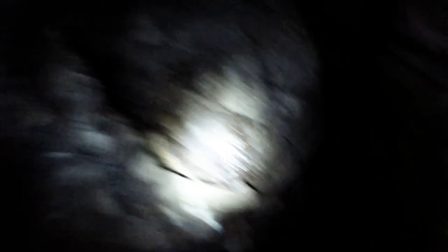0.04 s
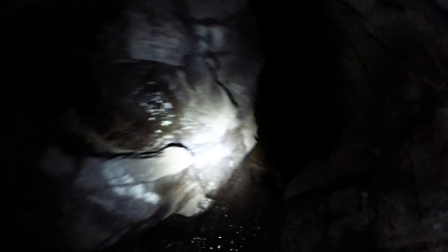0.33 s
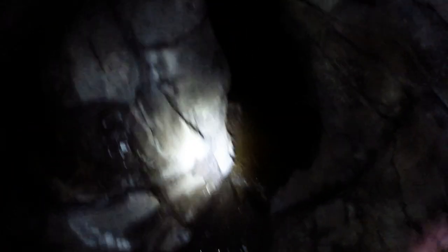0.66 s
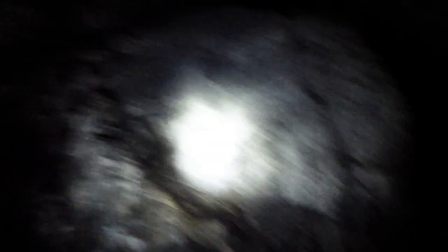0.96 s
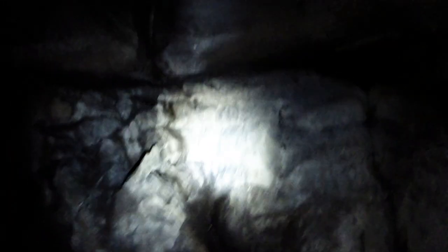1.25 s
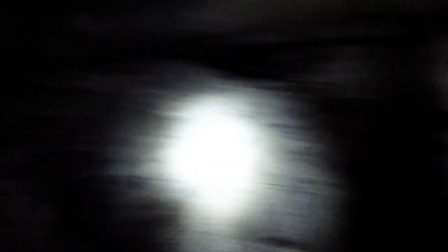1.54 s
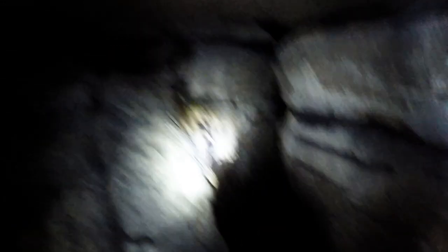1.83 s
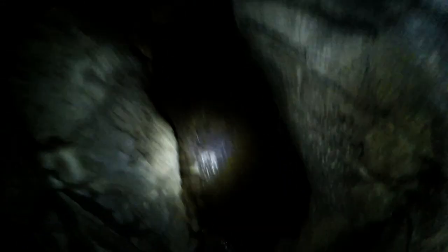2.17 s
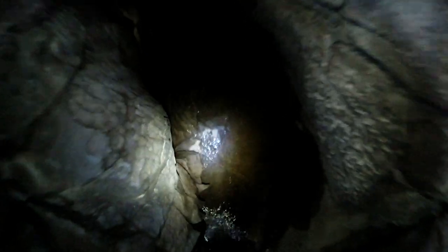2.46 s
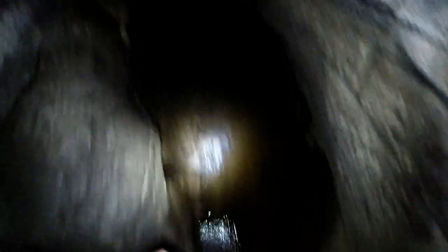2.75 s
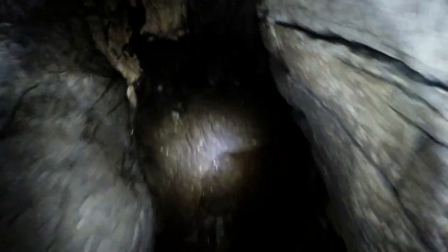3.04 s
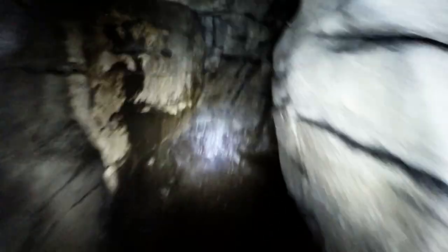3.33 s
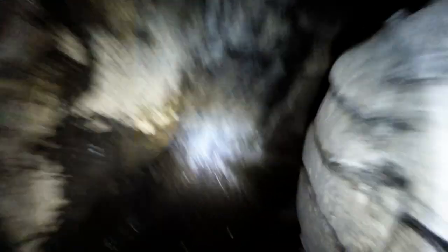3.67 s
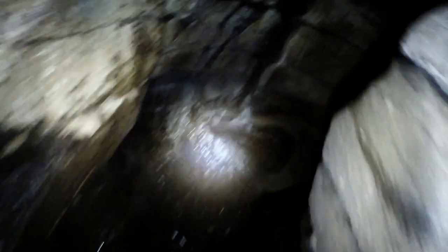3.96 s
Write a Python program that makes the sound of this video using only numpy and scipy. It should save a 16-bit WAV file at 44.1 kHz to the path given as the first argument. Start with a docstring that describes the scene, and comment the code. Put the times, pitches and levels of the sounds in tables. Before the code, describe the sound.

A stream rushes and gurgles steadily in a narrow cave passage. The microphone on a walking caver's helmet rumbles and bumps softly, then scrapes the rock and knocks with a deep thud near the end.

```python
"""A narrow cave passage with a rushing stream, heard from a cased camera on a walking caver's helmet.
Dense bubbles and spray blur between the rock walls, and the case rings near 2.5 kHz. The mount rumbles
and bumps as the caver moves, and the case ticks; at 3 s it scrapes the rock and knocks with a deep thud.
"""
import sys
import numpy as np
from scipy import signal
from scipy.fft import rfft, irfft
from scipy.io import wavfile

SR = 44100
rng = np.random.default_rng(int(sys.argv[2]) if len(sys.argv) > 2 else 0)


def to_wav(sig):
    """Store sig (one row per channel, or 1-D mono) as 16-bit WAV at the path in sys.argv[1].

    Samples outside -1..1 are clipped; the rate is SR.
    """
    pcm = np.clip(np.atleast_2d(sig), -1, 1) * 32767
    pcm = np.round(pcm).astype(np.int16)
    wavfile.write(sys.argv[1], SR, pcm.T)  # frames by channels


N = 176400
T = np.arange(N) / SR

# Swells of the four water layers as the head turns. Each row: time in seconds, level in dB.
CHURN_LEVEL = [(0, -59.5), (.24, -51.5), (.6, -55.5), (.85, -57), (1.1, -49), (1.43, -53), (1.88, -52),
               (2.1, -55.5), (2.65, -56.5), (3.15, -57), (3.4, -56.5), (3.7, -53.5), (4, -53)]
GURGLE_LEVEL = [(0, -51.5), (.1, -50.5), (.23, -43), (.45, -46.5), (.78, -50), (.9, -45), (1.02, -43),
                (1.14, -41.5), (1.3, -45), (1.55, -43), (1.9, -44), (2.1, -46.5), (2.45, -48), (2.9, -47),
                (3.05, -44.5), (3.2, -48.5), (3.3, -45.5), (3.55, -43.5), (3.7, -43.5), (3.8, -45.5),
                (4, -47.5)]
RUSH_LEVEL = [(0, -44), (.15, -43.5), (.7, -44.5), (.82, -45), (.92, -39), (1.1, -37.5), (1.22, -41.5),
              (1.38, -41), (1.52, -39.5), (1.7, -38), (1.92, -43.5), (2.2, -43.5), (2.6, -43.5), (2.8, -40),
              (3.0, -41.5), (3.25, -42), (3.5, -40), (3.8, -43), (4, -46)]
SPRAY_LEVEL = [(0, -51.5), (.22, -51), (.27, -50), (.5, -49), (.8, -49), (1.02, -44.5), (1.3, -47),
               (1.7, -44), (1.95, -48), (2.3, -45.5), (2.55, -47.5), (2.8, -45.5), (3.2, -46.5),
               (3.5, -45.5), (3.75, -49), (4, -46.5)]
# Tone of each layer through the case. Each row: frequency in Hz, gain in dB.
CHURN_EQ = [(190, -2), (300, -5), (460, -4), (650, -2.5), (820, 2), (1000, 1), (1300, -5.5), (2000, -10)]
GURGLE_EQ = [(600, -27), (820, -17.5), (980, -8), (1130, -5), (1310, 3), (1600, 2.5), (1850, -3),
             (2200, -24), (3000, -36)]
RUSH_EQ = [(1400, -25), (1900, -14), (2200, -4.5), (2450, -0.5), (2650, -2.5), (2950, -15), (3500, -16)]
SPRAY_EQ = [(2000, -6.5), (3000, -7.5), (3500, -0.5), (3780, -7), (4120, 1), (4400, -3), (4660, 0.5),
            (5260, -8.5), (5620, -3.5), (5850, -7), (6030, -4.5), (6350, -10), (6700, -7.5), (7300, -14.5),
            (8200, -18.5), (10200, -18.5), (11800, -26.5), (13000, -25.5), (14300, -29), (15300, -23.5)]
# Texture of each layer. In order: bubbles per second, spread of their strengths in dB,
# ring length in cycles, wash level in dB, flutter depth in dB, trim in dB.
CHURN_TEXTURE = (902.5, 2.5, 16.5, -0.5, 1.3, 1)
GURGLE_TEXTURE = (1480, 2.5, 14.5, -1, 1.62, -.5)
RUSH_TEXTURE = (2483, 2, 23, 0.5, 0.5, 1)
SPRAY_TEXTURE = (5007, 3, 6.5, 1.5, 0.55, -0.5)
# Handling rumble of the mount. Each row: time in seconds, level in dB.
RUMBLE_LEVEL = [(0, -42), (.15, -44), (.3, -49), (.55, -49), (.76, -46), (.85, -36), (.98, -44.5),
                (1.15, -38.5), (1.4, -40), (1.65, -35.5), (1.8, -46.5), (2.05, -37.5), (2.3, -49.5),
                (2.55, -42.5), (2.78, -44.5), (2.9, -35), (3.1, -41), (3.3, -42), (3.44, -45.5),
                (3.52, -34), (3.59, -29.5), (3.65, -40.5), (3.85, -47.5), (4, -46.5)]
# Tone of the helmet's noises. Each row: frequency in Hz, gain in dB.
RUMBLE_EQ = [(15, 0), (28, 3), (42, 2.5), (60, -5), (80, -10.5), (110, -6.5), (150, -8.5), (190, -21),
             (260, -29), (500, -69)]
CRUNCH_EQ = [(100, -4), (170, 5), (270, -2), (400, -8), (600, -7), (1100, 0), (1800, -14), (2450, 4),
             (3200, -10), (8000, -29)]
SCRAPE_EQ = [(500, -11), (1500, -5), (2500, 12), (3200, -1.5), (4700, 5.5), (7500, -9.5), (10500, -15),
             (12000, -27), (15000, -26)]
SCUFF_EQ = [(5000, -6), (9500, 8), (12000, -4), (13500, -2), (15000, -3)]
# Taps on the case and bumps in the mount. Each row: start in seconds, strength in dB.
TICK_HITS = [(.052, -24), (.062, -27), (.074, -28), (.109, -28), (3.037, -26.5)]
JOLT_HITS = [(0.108, -29), (.412, -36), (0.695, -40), (0.851, -48), (1.119, -35), (1.151, -44),
             (1.367, -28), (1.405, -27), (1.564, -31.5), (1.676, -43), (1.725, -33), (1.867, -33),
             (2.347, -36), (2.537, -29.5), (2.567, -31.5), (2.652, -36), (2.831, -39), (2.882, -25),
             (3.041, -24), (3.581, -33), (3.672, -37)]
# Blows on the helmet. Each row: start in seconds, strength in dB, contact time in seconds.
KNOCK_HITS = [(2.855, -20.5, 0.021), (2.981, -7.5, 0.019), (3.003, -4.5, 0.0075), (3.024, -15, .012),
              (3.074, -17.5, .014), (3.479, -24.5, 0.011), (3.505, -23, 0.0097), (3.533, -23.5, 0.016),
              (3.588, -24.5, 0.017)]
# Resonances of case and mount. Each row: frequency in Hz, gain in dB, 60 dB decay time in seconds.
CASE_MODES = [(2340, -12.5, 0.065), (2430, 4.5, 0.068), (2590, -4, 0.076)]
MOUNT_MODES = [(42.4, -8.5, 0.57), (55.3, 2, 0.107), (89, -4, 0.083), (133, -4.5, 0.057), (230, -16, 0.11)]


def from_db(db):
    """Decibels to gain."""
    return 10 ** (np.asarray(db) / 20)


def rms_one(x):
    """Scale to unit rms."""
    return x / np.sqrt(np.mean(x ** 2) + 1e-20)


def level(rows):
    """A fader ride through rows of time in seconds and level in dB."""
    return from_db(np.interp(T, *np.transpose(rows)))


def coloured(x, points):
    """EQ a steady sound, falling steeply beyond both ends of the curve; rms 1."""
    hz, db = np.transpose(points)
    f = np.maximum(np.arange(N // 2 + 1) * SR / N, 1)
    skirts = np.minimum(1, np.minimum(f / hz[0], hz[-1] / f)) ** 3
    curve = from_db(np.interp(np.log(f), np.log(hz), db))
    return rms_one(irfft(rfft(x) * skirts * curve, N))


def drift(rate):
    """A smooth random wobble with spread 1."""
    r = np.exp(-80 * np.pi * rate / SR)
    slow = signal.lfilter([1], [1, -2 * r, r * r], rng.standard_normal(N // 40 + 2002))[2000:]
    return np.interp(np.arange(N) / 40, np.arange(len(slow)), rms_one(slow))


def ring(force, hz, t60):
    """A unit click sets a sine of height 1 ringing."""
    r = np.exp(-np.log(1000) / (t60 * SR))
    w = 2 * np.pi * min(hz, SR / 2 - 1) / SR
    return signal.lfilter([0, np.sin(w)], [1, -2 * r * np.cos(w), r * r], force + 1e-18)


def burst(start, attack, hold, t60):
    """Envelope: rise, hold, die away."""
    rise = np.clip((T - start) / attack, 0, 1)
    return rise * np.exp(-np.log(1000) * np.maximum(T - start - attack - hold, 0) / t60)


def grains(per_s, spread_db):
    """Random clicks, many small and a few large."""
    sizes = from_db(spread_db * np.minimum(rng.exponential(1, N), 4)) * rng.choice([-1, 1], N)
    return sizes * (rng.random(N) < per_s / SR)


def push(start, contact):
    """Force of a soft contact, area 1: the longer it lasts, the duller the hit."""
    force = np.sin(np.pi * np.clip((T - start) / contact, 0, 1)) ** 2
    return force / force.sum()


def cave(sound, t60_s=0.37, echo_db=-1.5):
    """Direct sound plus the dense echoes of close rock walls."""
    echoes = rng.standard_normal(SR) * burst(0, 0.012, 0, t60_s)[:SR]
    return sound + from_db(echo_db) * signal.fftconvolve(sound, echoes / np.linalg.norm(echoes))[:N]


def water(swells, eq, texture, low_hz, high_hz, pitch_count=48):
    """Bubbles of many pitches ring in the passage over the wash of water farther away."""
    per_s, spread_db, cycles, wash_db, flutter_db, trim_db = texture
    pops = grains(per_s, spread_db)
    pitch_index = rng.integers(0, pitch_count, N)
    pitches = np.geomspace(low_hz, high_hz, pitch_count)
    bubbles = sum(np.sqrt(hz) * ring(pops * (pitch_index == k), hz, cycles / hz)
                  for k, hz in enumerate(pitches))
    blurred = coloured(cave(bubbles), eq)
    wash = from_db(wash_db) * coloured(rng.standard_normal(N), eq)
    return rms_one(blurred + wash) * level(swells) * from_db(trim_db + flutter_db * drift(36))


def stream():
    """Deep water churns, large bubbles gurgle, small ones rush, spray fizzes."""
    return (water(CHURN_LEVEL, CHURN_EQ, CHURN_TEXTURE, low_hz=273, high_hz=1350)
            + water(GURGLE_LEVEL, GURGLE_EQ, GURGLE_TEXTURE, low_hz=773, high_hz=2480)
            + water(RUSH_LEVEL, RUSH_EQ, RUSH_TEXTURE, low_hz=1577, high_hz=3460)
            + water(SPRAY_LEVEL, SPRAY_EQ, SPRAY_TEXTURE, low_hz=2900, high_hz=16000))


def rumble(shudder_db=1.87, shudder_per_s=12):
    """The mount shudders unevenly as the caver moves."""
    low_end = coloured(rng.standard_normal(N), RUMBLE_EQ)
    shudder = from_db(shudder_db * drift(shudder_per_s))
    return level(RUMBLE_LEVEL) * rms_one(low_end * shudder)


def ticks():
    """Light cushioned taps ring the case, each mode with a new strength on every tap."""
    taps = np.array([from_db(db) * push(start, contact=0.0003) for start, db in TICK_HITS])
    return sum(ring(from_db(db + rng.normal(0, 1.9, len(taps))) @ taps, hz, t60)
               for hz, db, t60 in CASE_MODES) / 2


def jolts():
    """The camera shifts in its mount with short dull bumps."""
    force = sum(from_db(db) * push(start, contact=0.0036) for start, db in JOLT_HITS)
    return ring(force, hz=141, t60=0.051)


def knocks(crunch_db=-29.5):
    """Soft blows shake the mount's low modes and crush a little grit."""
    force = sum(from_db(db) * push(start, contact) for start, db, contact in KNOCK_HITS)
    thud = sum(from_db(db) * ring(force, hz, t60) for hz, db, t60 in MOUNT_MODES)
    crush = sum(from_db(db) * burst(start, contact / 2, hold=0, t60=0.11)
                for start, db, contact in KNOCK_HITS)
    grit = coloured(grains(per_s=4300, spread_db=3), CRUNCH_EQ)
    return thud + from_db(crunch_db) * crush * grit


def scrape(start_s=2.944, attack_s=0.021):
    """The case brushes the rock just before the big thud, with a bright scuff at first touch."""
    rub = from_db(-35) * burst(start_s, attack_s, hold=0.024, t60=0.17)
    scuff = from_db(-47) * burst(start_s, attack_s, hold=0, t60=0.086)
    return (rub * coloured(rng.standard_normal(N), SCRAPE_EQ)
            + scuff * coloured(rng.standard_normal(N), SCUFF_EQ))


def scene():
    """A mono bed of water with the helmet's own noises up close."""
    return (stream() + rumble() + jolts() + knocks() + scrape() + ticks())[None]


def record(dry, cutoff_hz=15250):
    """A steep low-pass takes off the very top."""
    return signal.sosfilt(signal.ellip(10, .1, 80, cutoff_hz, fs=SR, output="sos"), dry)


dry = scene()
out = record(dry)
to_wav(out)
```